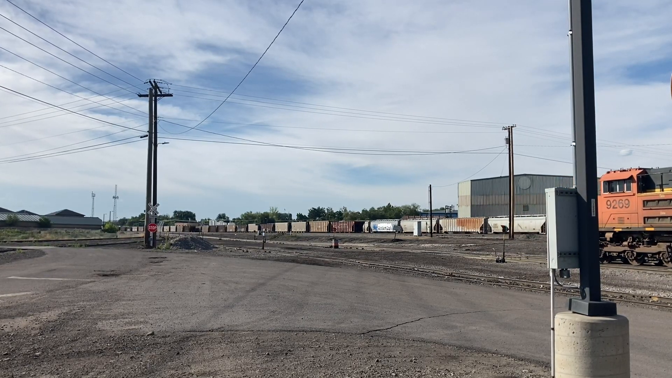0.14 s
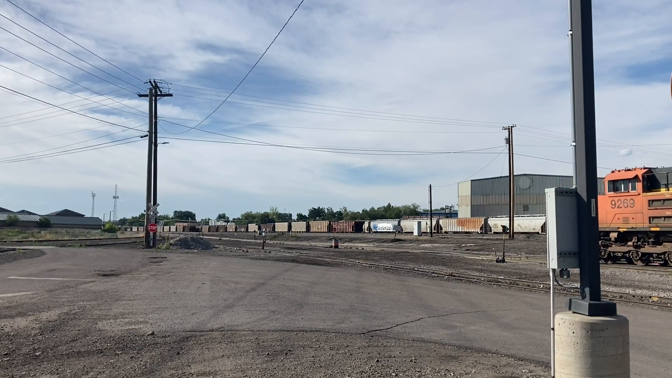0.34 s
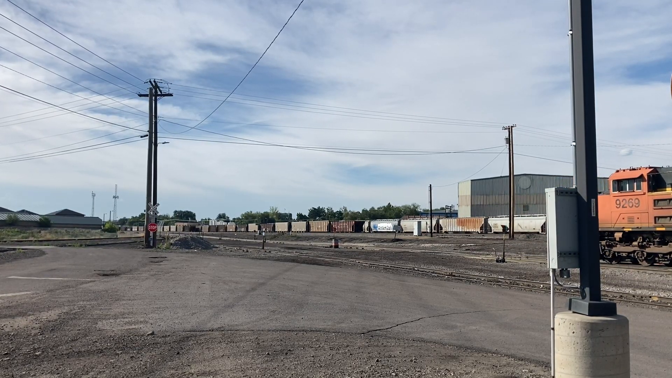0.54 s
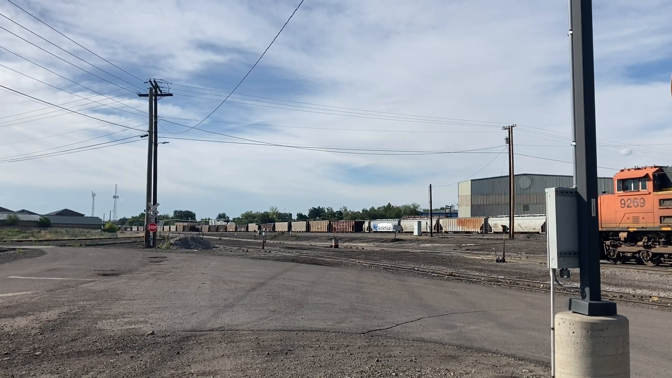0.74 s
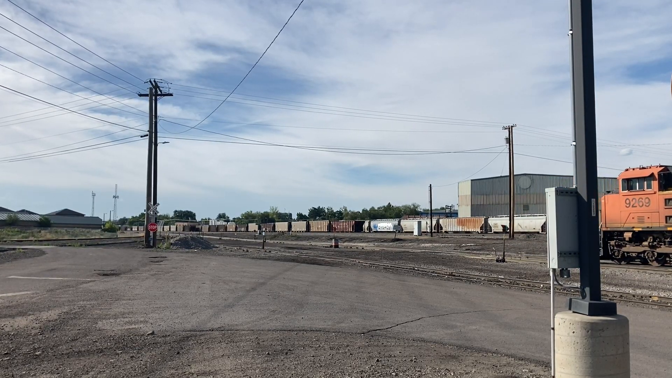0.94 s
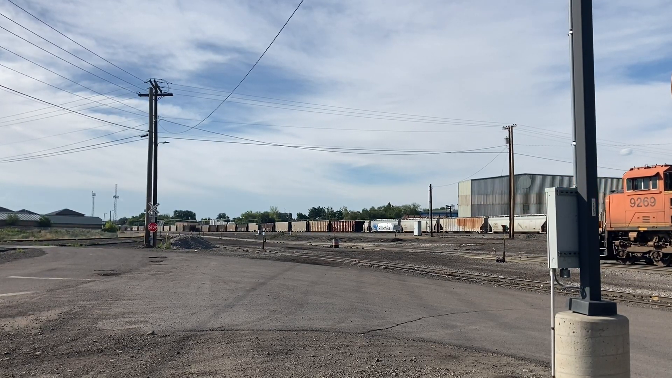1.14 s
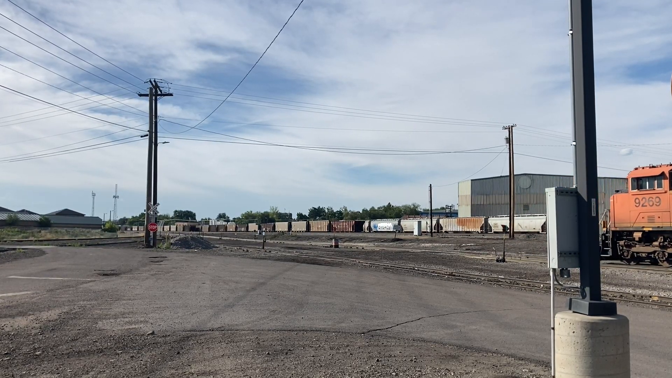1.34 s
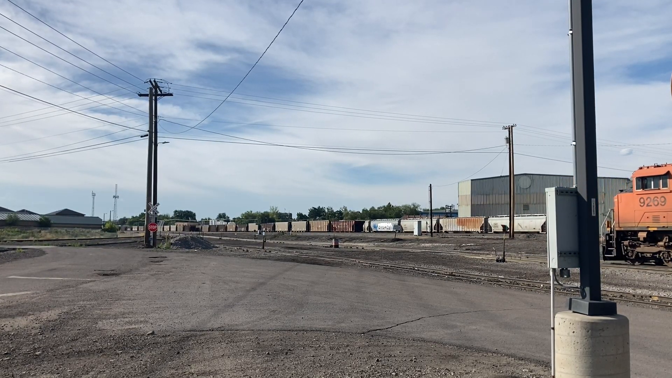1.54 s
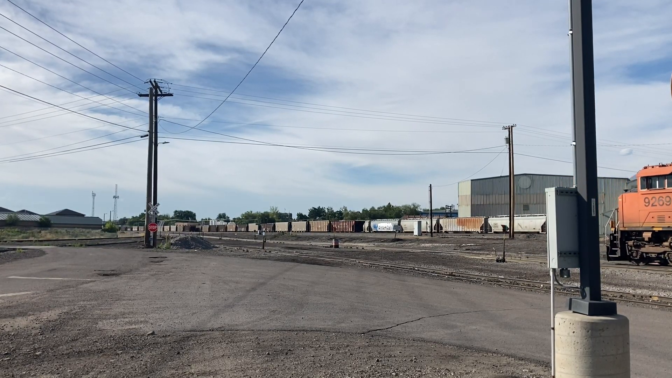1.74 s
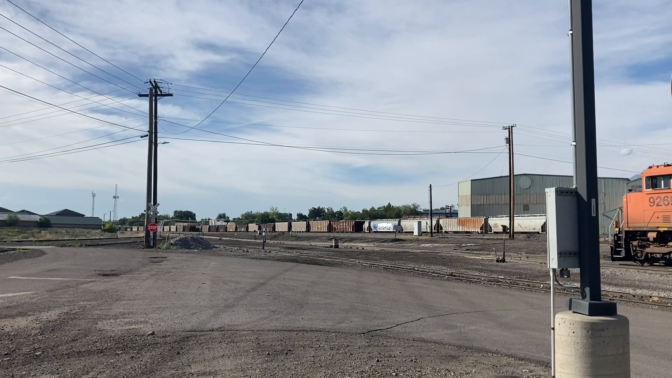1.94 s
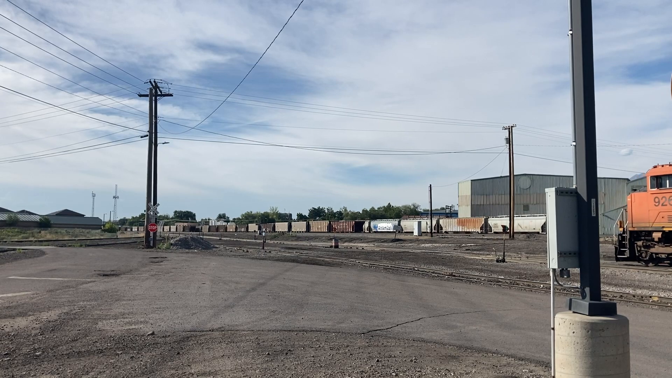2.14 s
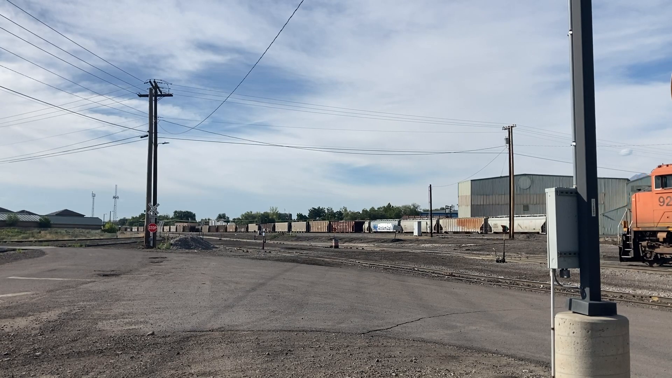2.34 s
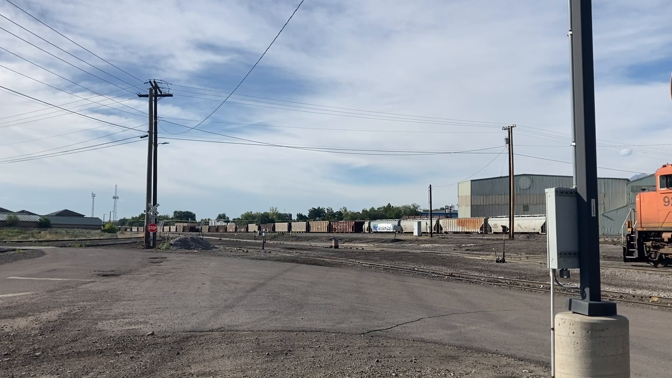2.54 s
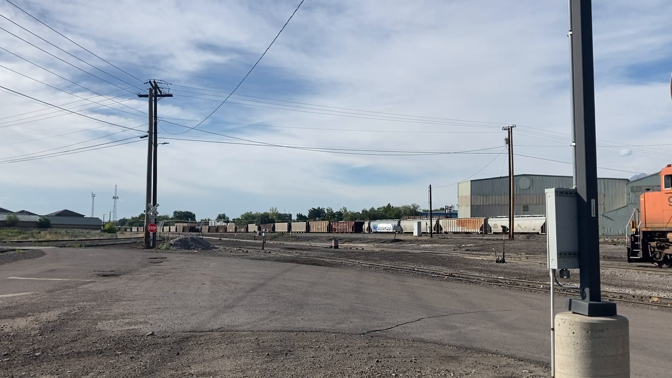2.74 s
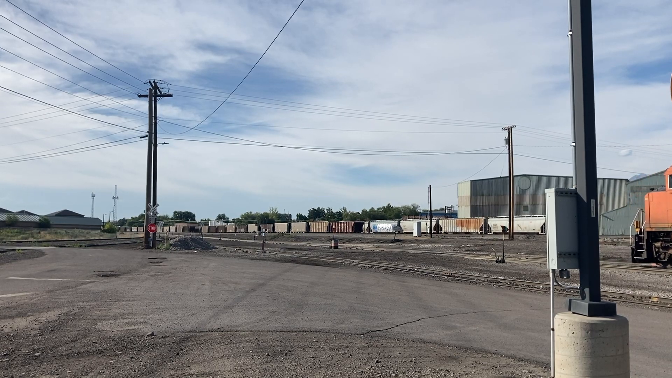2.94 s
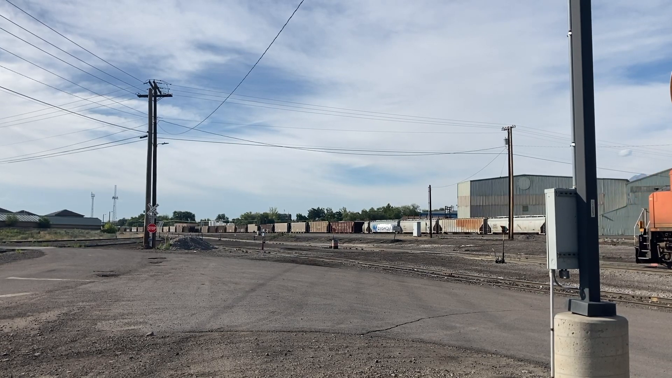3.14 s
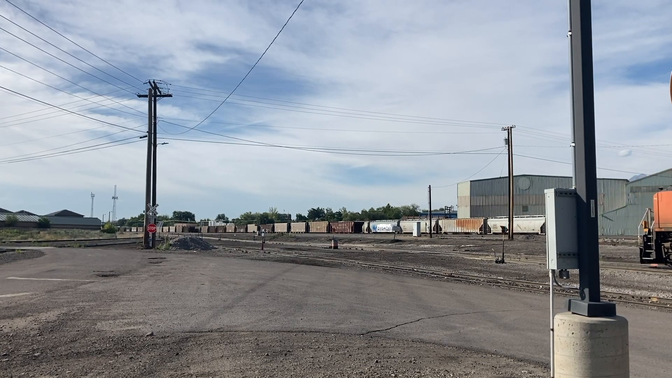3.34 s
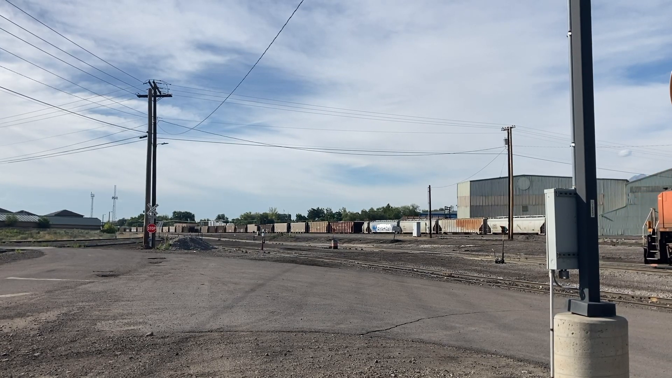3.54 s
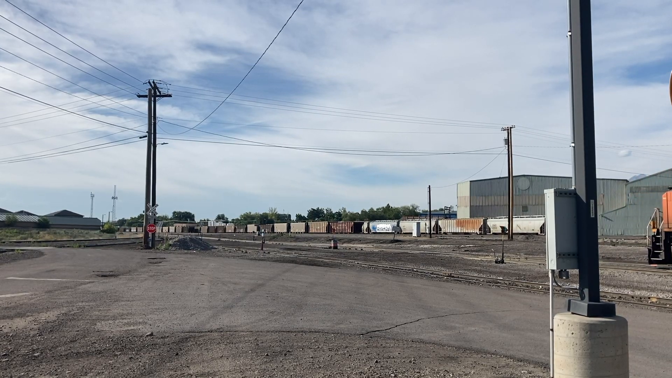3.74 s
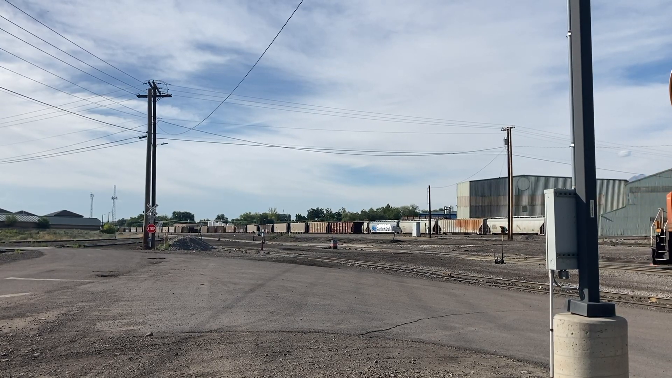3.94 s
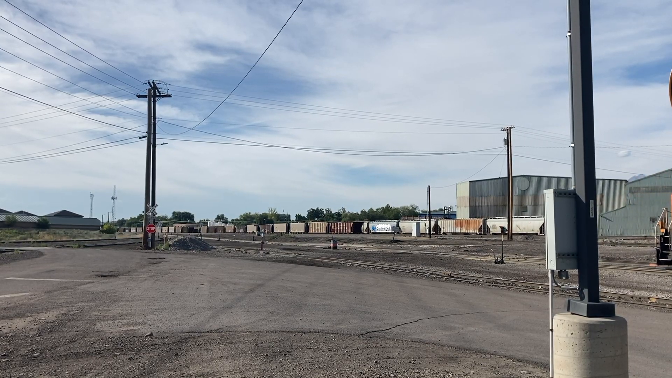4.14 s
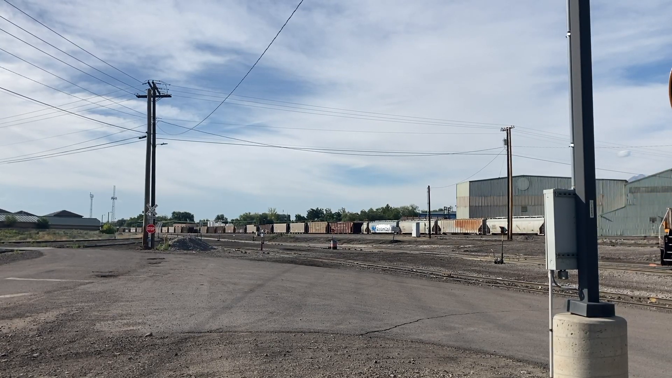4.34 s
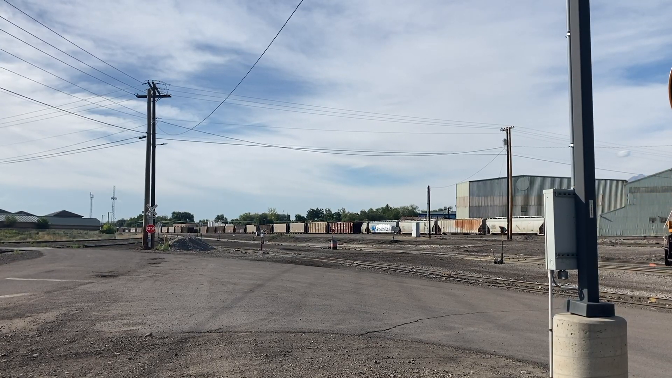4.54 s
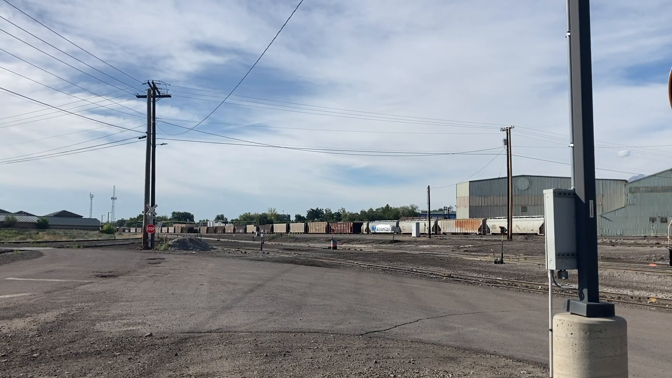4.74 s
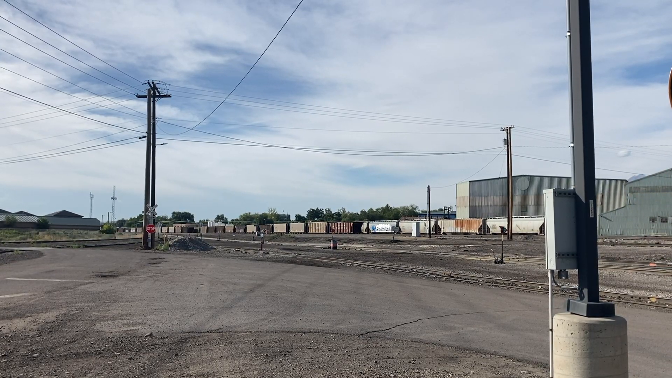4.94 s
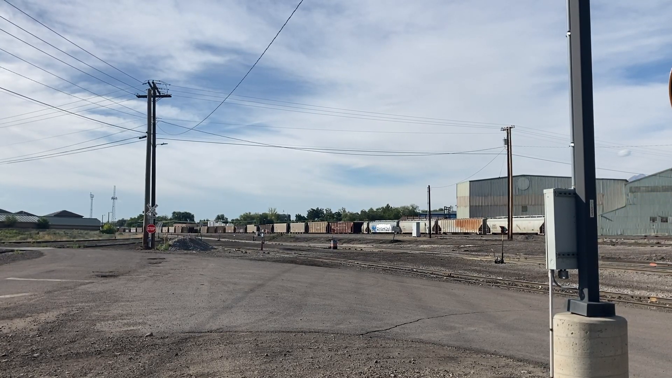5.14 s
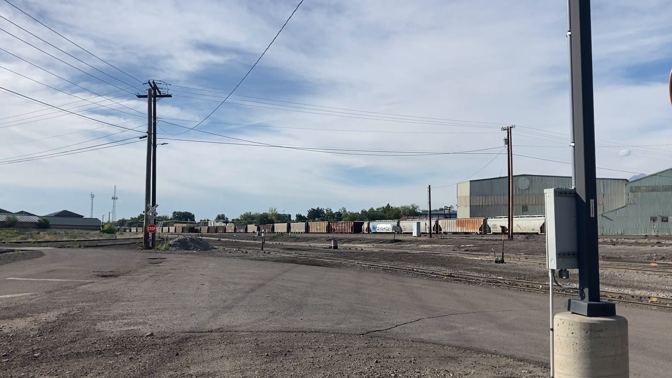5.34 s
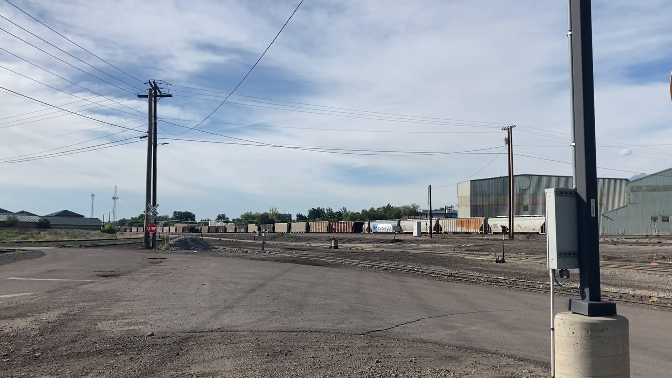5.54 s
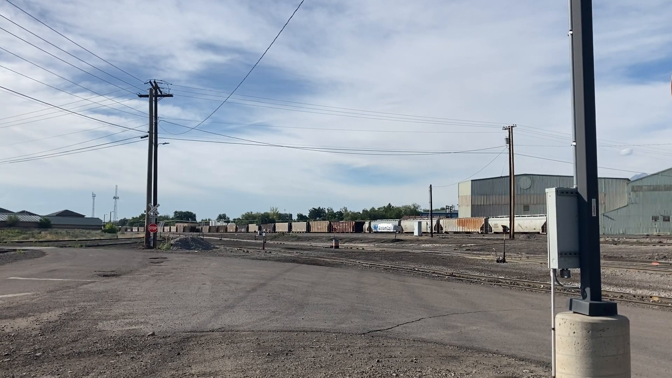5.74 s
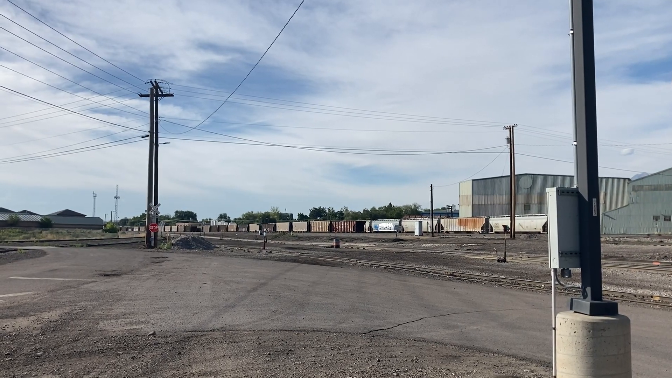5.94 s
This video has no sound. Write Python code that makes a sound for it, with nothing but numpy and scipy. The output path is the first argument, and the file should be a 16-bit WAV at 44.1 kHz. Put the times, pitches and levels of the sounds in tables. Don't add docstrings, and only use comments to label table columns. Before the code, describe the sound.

Heavy diesel engine rumble with a fast throb and thin whine sinks in pitch and recedes, with metallic chirps and a late wheel squeal.

```python
import sys
import numpy as np
from scipy import signal
from scipy.fft import rfft, irfft, next_fast_len
from scipy.io import wavfile
from scipy.ndimage import uniform_filter1d

SR = 44100
rng = np.random.default_rng(int(sys.argv[2]) if len(sys.argv) > 2 else 0)


def gain_from_decibels(decibels):
    exponent = np.asarray(decibels, float) / 20
    return 10 ** exponent


def log_audio(samples):
    frames = np.atleast_2d(samples).T
    limited = np.clip(frames, -1, 1)
    pcm = np.round(limited * 32767).astype(np.int16)
    wavfile.write(sys.argv[1], SR, pcm)


N = 268569
TIME_S = np.arange(N) / SR
EDGE = SR // 4
SIZE = next_fast_len(N + 2 * EDGE)
HZ = np.maximum(np.arange(SIZE // 2 + 1) * SR / SIZE, 1)

# (time [s], turn rate [Hz])
CRANK_HZ = [
    (0, 11.865),
    (1.2, 11.91),
    (1.8, 11.74),
    (3.6, 10.855),
    (5.4, 10.025),
    (6.09, 9.85),
]
# (time [s], level [dB])
BARK_DB = [(0, -32), (1.2, -30.5), (1.8, -27), (3.0, -23.5), (3.6, -23.5), (4.2, -22.5), (5.4, -22.5),
           (5.75, -26), (6.09, -28)]
# (centre [Hz], width [Hz], level [dB])
UPPER_STACK_MODES = [(194.4, 18.4, 2), (212.35, 8.3, -11)]
# (centre [Hz], width [Hz], level [dB])
LOWER_STACK_MODES = [(149.1, 14.2, 6), (124.7, 15.6, 3.5), (100.8, 12, -6.5)]
# (centre [Hz], width [Hz], level [dB])
CRANKCASE_MODES = [(65.5, 20, 7), (76.7, 18, 11.5)]
# (centre [Hz], width [Hz], level over the leak [dB])
VALVE_GEAR_MODES = [(2580, 150, -11), (3150, 300, -5), (4500, 1200, -5.5)]
# (start [s], end [s], level [dB])
RATTLE_BOUTS = [
    (2.4, 3.75, 1.5),
]
# (start [s], end [s], level [dB])
THROB_GEAR_BOUTS = [(-.3, .8, -45), (.85, 1.27, -42), (1.3, 1.63, -47), (2.35, 2.8, -53), (3.1, 3.45, -52)]

# (time [s], firing rate [Hz])
FIRING_HZ = [(0, 49.5), (.4, 49.55), (1.6, 50.33), (2.0, 50.14), (2.4, 49.42), (4.0, 44.5), (4.4, 43.2),
             (4.8, 42.3), (5.2, 41.45), (6.09, 40.65)]
# (multiple of the eight-firing cycle [-], level over the hum [dB])
HUM_ORDERS = [
    (8, 0),
    (9, -7),
    (10, -12),
]
# (multiple of the eight-firing cycle [-], level [dB])
SIDE_ORDERS = [(11, -36), (12, -41), (13, -40), (14, -43), (15, -41), (16, -42), (17, -42)]
# (multiple of firing rate [-], start [s], end [s], level [dB])
OVERTONES = [(5, .4, 1.3, -44), (6, .3, 1.1, -48), (7, 2.3, 2.85, -45), (7, 2.9, 3.5, -47),
             (7.3, 4.7, 5.25, -47), (7.3, 5.6, 6.3, -46), (9, 1.15, 1.5, -46), (14, .8, 1.75, -46),
             (14, 2.55, 3.0, -47), (16.1, 4.6, 5.2, -50), (15.4, 5.0, 5.5, -50)]
# (start [s], end [s], level [dB])
GEAR_BOUTS = [(-.3, .74, -41), (.8, .92, -50), (.95, 1.37, -45), (1.4, 2.07, -43), (2.15, 2.42, -49),
              (2.45, 2.72, -46), (2.8, 3.1, -47), (3.1, 3.5, -50), (4.1, 4.9, -50)]
# (start [s], end [s], level [dB])
OCTAVE_BOUTS = [(-.3, 1.0, -64), (1.0, 1.38, -60), (1.52, 1.9, -60), (1.62, 1.84, -58), (1.95, 2.04, -59)]
# (start [s], end [s], level [dB])
IDLER_BOUTS = [
    (-.3, .3, -55),
    (1.25, 2.12, -51),
    (2.25, 2.42, -53),
]
# (start [s], end [s], level [dB])
BLOWER_BOUTS = [
    (2.9, 3.3, -52),
    (3.55, 4.55, -50.5),
    (4.55, 5.15, -54),
]
# (start [s], end [s], level [dB])
TURBO_BOUTS = [(-.2, .12, -61), (.2, .6, -66), (.85, 1.62, -60), (1.76, 1.92, -60), (2.25, 3.65, -62),
               (3.65, 4.15, -58.5), (4.22, 4.9, -62), (4.95, 5.18, -64), (5.25, 6.3, -63)]

# (time [s], cycle rate [Hz])
THIRD_CYCLE_HZ = [(0, 6.03), (1.5, 6.04), (2.0, 5.9), (2.8, 5.68), (3.6, 5.5), (4.4, 5.35), (5.2, 5.19),
                  (6.09, 5.02)]
# (multiple of cycle [-], start [s], end [s], level [dB])
THIRD_ORDERS = [(11, .1, 1.5, -24), (11, 3.3, 6.5, -35), (12, 1.8, 6.5, -30), (12, 2.5, 3.3, -31),
                (13, -.4, 1.3, -22), (13, 1.3, 3.8, -33), (13, 3.9, 5.8, -27), (15.5, -.4, 1.6, -34),
                (19.6, 1.1, 1.9, -34), (15, 4.2, 6.5, -34), (16, 4.2, 6.5, -35), (16, 5.3, 6.5, -36),
                (17, -.4, 1.4, -32)]

# (frequency [Hz], density [dB per Hz])
ROAR_COLOUR = [(28, -60), (45, -45), (80, -45), (200, -50), (250, -59), (500, -67), (690, -64), (790, -69),
               (1350, -66), (1650, -74), (3100, -81), (5500, -88), (9000, -99), (13000, -116)]
# (centre [Hz], width [Hz], level [dB])
PANEL_MODES = [(110.4, 13, -34.5), (169.5, 20.6, -33), (240.3, 23, -49.5), (294, 54, -45),
               (357.4, 67, -45.5), (450, 60, -49.5), (631.7, 73, -44.5), (687, 36, -46.5), (909, 220, -47),
               (1410, 140, -53), (2100, 540, -52), (3046, 280, -60), (6900, 2700, -66)]
# (frequency [Hz], share [-])
FADE_SHARES = [(100, 0.054), (250, 1), (1000, 0.83), (4000, 1)]

# (time [s], peak level [dB], pitch [Hz])
CHIRPS = [(2.4379, -41, 3150), (2.6045, -41, 3170), (2.6908, -47, 3170), (2.7626, -46, 3210),
          (2.9587, -43, 3160), (3.049, -47, 3140), (3.1443, -51, 3040), (3.2355, -41, 3150),
          (3.3218, -47, 3020), (3.5004, -45, 3150), (3.5838, -44, 3080), (3.7778, -47, 3140),
          (3.8701, -49, 3150), (4.152, -46, 3140),
          (2.5755, -37, 2710),
    (2.7501, -45, 2680),
    (2.9312, -45, 2620),
]
# (time [s], level [dB], centre [Hz], rise [s], fall [s])
SPITS = [
    (.835, -45.5, 7200, 0.024, 0.017),
    (2.275, -47.5, 6760, 0.01, 0.033),
    (2.58, -53, 6750, 0.025, 0.044),
    (3.1, -58, 6400, 0.011, .015),
    (3.856, -52, 7250, 0.0076, 0.016),
]
# (start [s], end [s], level [dB])
SQUEAL_BOUTS = [
    (5.65, 5.72, -53),
    (5.8, 5.91, -49),
    (5.99, 6.2, -46),
]
# (start [s], end [s], level [dB])
RAIL_BOUTS = [
    (3.6, 4.0, -71),
    (4.45, 6.3, -68),
]
RAIL_PORT_GAINS = (-.6, 1)

# (centre [Hz], width [Hz], gain [dB])
HOLLOWS = [(3600, 65, -11.5), (5200, 1600, -2), (6060, 180, 3), (1180, 400, -2), (255, 31, 0.5),
           (4270, 59, 5), (751, 44, -1), (527, 50, -1.5), (1670, 200, 1), (241, 18, -0.5), (968, 52, 1.5)]
# (frequency [Hz], left minus right [dB], likeness [0-1], left lead besides its lag [rad])
PORTS = [(40, -.8, .95, 0), (70, -1.5, .9, -.1), (150, -2, .95, -.03), (260, -.6, .98, 0),
         (430, 2, .9, -.5), (620, -2.5, .92, -.8), (820, -7, .85, 0), (1100, 1, .8, -.3),
         (1350, -1, .94, .45), (1750, 1, .8, .4), (2200, 2.2, .4, 0), (2600, 2, .4, .3),
         (3100, 1.2, .7, .1), (3600, 0, .35, 1.2), (4150, 0, .7, -.5), (4750, -1, .7, 1.6),
         (5250, -4, .45, .6), (5680, -3.5, .4, 1.9), (6500, 0, .8, -1), (7600, 0, .85, -.4),
         (8700, 0, .95, -.6), (9400, 0, .95, .3), (11400, 0, .9, .6), (13500, 0, .9, 1.2),
         (14300, 0, .9, 2), (15000, 0, .9, 1)]


def curve(table):
    time_s, value = np.transpose(table)
    return np.interp(TIME_S, time_s, value)


def over_hz(table, column):
    table = np.array(table)
    return np.interp(np.log(HZ), np.log(table[:, 0]), table[:, column])


def unit(x):
    return x / np.sqrt(np.mean(x ** 2))


def noise():
    return rng.standard_normal(N)


def ring(x, hz, width_hz):
    b, a = signal.iirpeak(hz, hz / width_hz, fs=SR)
    return signal.lfilter(b, a, signal.lfilter(b, a, x))


def walk(rate_hz):
    hold = int(SR / rate_hz)
    held = np.repeat(rng.standard_normal(N // hold + 1), hold)
    return 1.5 * uniform_filter1d(uniform_filter1d(held, hold), hold)[:N]


def line(hz, db, wander_db, rate_hz, blur_turns):
    turns = np.cumsum(hz + 0 * TIME_S) / SR + rng.random() + blur_turns * walk(rate_hz)
    return np.sqrt(2) * gain_from_decibels(db + wander_db * walk(rate_hz)) * np.sin(2 * np.pi * turns)


def ramp(middle_s, takes_s):
    return np.clip(.5 + (TIME_S - middle_s) / takes_s, 0, 1)


def bouts(table, quiet_db, takes_s):
    gain = gain_from_decibels(quiet_db)
    for start_s, end_s, db in table:
        gain = gain + gain_from_decibels(db) * ramp(start_s, takes_s) * (1 - ramp(end_s, takes_s))
    return 20 * np.log10(gain)


def spreading_db():
    start_m, away_m_s = 34.6, 7.75
    distance_m = start_m + away_m_s * TIME_S
    return -20 * np.log10(distance_m / np.mean(distance_m))


def stack(blows, modes):
    out = 0
    for k, (hz, width_hz, db) in enumerate(modes):
        pipe = ring(ring(blows, hz, 2.13 * width_hz), hz, 2.13 * width_hz)
        out = out + (-1) ** k * gain_from_decibels(db) * unit(pipe)
    return unit(out)


def throb_exhaust(turns):
    blow_turn, stack_lag_s = -.1, 0.0156
    open_db, shut_db, screened_db = 3.5, -2, -1
    count = np.floor(turns - blow_turn)
    blows = (np.diff(count, prepend=count[0] - 1) > 0) * gain_from_decibels(noise())
    uneven = blows * (1 + 1.7 * np.cos(np.pi * count))
    upper = np.roll(stack(blows, UPPER_STACK_MODES), int(stack_lag_s * SR))
    lower = gain_from_decibels(-1.0) * stack(blows, LOWER_STACK_MODES) + gain_from_decibels(-8) * stack(uneven, CRANKCASE_MODES)
    upper_db = curve(BARK_DB)
    lower_db = upper_db + open_db + (shut_db - open_db) * ramp(1.6, .6) + screened_db * ramp(4.2, 1.7)
    return gain_from_decibels(upper_db) * upper + gain_from_decibels(lower_db) * lower


def leak_and_valve_gear(turns):
    leak_turn, leak_db, leak_fade_share = .83, -63, 1.58
    beat = np.cos(2 * np.pi * (turns - leak_turn))
    puff = gain_from_decibels(3.9 * np.tanh(3.5 * beat) + 0.74 * walk(26))
    tick = gain_from_decibels(8 * beat - 2)
    white = noise()
    hiss = ring(white, 10450, 2400) + gain_from_decibels(-5) * ring(white, 9300, 1400) + gain_from_decibels(-11) * ring(white, 12900, 1900)
    rattle = 0
    for hz, width_hz, db in VALVE_GEAR_MODES:
        rattle = rattle + gain_from_decibels(db + 2.2 * walk(30)) * unit(ring(noise(), hz, width_hz))
    rattle = gain_from_decibels(bouts(RATTLE_BOUTS, -0.39, 0.54)) * tick * rattle
    return gain_from_decibels(leak_db + leak_fade_share * spreading_db()) * (unit(puff * hiss) + rattle)


def throbber():
    crank_hz, gear_ratio = curve(CRANK_HZ), 107.2
    turns = np.cumsum(crank_hz) / SR
    gear_db = bouts(THROB_GEAR_BOUTS, -60, .08) + 1
    gear = line(gear_ratio * crank_hz, gear_db, wander_db=1.6, rate_hz=14, blur_turns=.03)
    return throb_exhaust(turns) + leak_and_valve_gear(turns) + gear


def firing_hum(firing_hz, slowing_hz):
    hum_db = -18 + 1.88 * slowing_hz
    cycle_hz = firing_hz / 8
    out = 0
    for k, db in HUM_ORDERS:
        out = out + line(k * cycle_hz, hum_db + db, wander_db=.7, rate_hz=6, blur_turns=.02)
    for k, db in SIDE_ORDERS:
        out = out + line(k * cycle_hz, db, wander_db=-2.5, rate_hz=1.2, blur_turns=0.045)
    for k, start_s, end_s, db in OVERTONES:
        level_db = bouts([(start_s, end_s, db)], -70, .3)
        out = out + line(k * firing_hz, level_db, wander_db=2.5, rate_hz=7, blur_turns=.1)
    return out


def gears_and_turbo(firing_hz, slowing_hz):
    gear_hz = 27.6 * firing_hz
    gear_db = bouts(GEAR_BOUTS, -57, .07) + 1.6 * slowing_hz + 2.5
    idler_db, octave_db = bouts(IDLER_BOUTS, -64, .1), bouts(OCTAVE_BOUTS, -72, .08)
    blower_db = bouts(BLOWER_BOUTS, -62, .3)
    turbo_db = bouts(TURBO_BOUTS, -67, .06) + 1.5 * walk(35)
    out = line(gear_hz, gear_db, wander_db=1.3, rate_hz=14, blur_turns=.025)
    out = out + line(.868 * gear_hz, idler_db, wander_db=2, rate_hz=12, blur_turns=.06)
    out = out + line(2 * gear_hz, octave_db, wander_db=1.4, rate_hz=14, blur_turns=.06)
    out = out + line(.436 * gear_hz, blower_db, wander_db=2.2, rate_hz=5, blur_turns=.08)
    return out + line(4.085 * gear_hz, turbo_db, wander_db=3, rate_hz=120, blur_turns=.2)


def hummer():
    firing_hz, full_hz = curve(FIRING_HZ), 50
    slowing_hz = np.minimum(firing_hz - full_hz, 0)
    return firing_hum(firing_hz, slowing_hz) + gears_and_turbo(firing_hz, slowing_hz)


def third_engine():
    cycle_hz = curve(THIRD_CYCLE_HZ)
    out = line(31.5, -44, wander_db=2, rate_hz=1.3, blur_turns=.04)
    for k, start_s, end_s, db in THIRD_ORDERS:
        level_db = bouts([(start_s, end_s, db)], -70, .4)
        out = out + line(k * cycle_hz, level_db, wander_db=1.2, rate_hz=4, blur_turns=.04)
    return out


def roar():
    spectrum = rfft(rng.standard_normal(SIZE)) * gain_from_decibels(over_hz(ROAR_COLOUR, 1) - 2.5) * np.sqrt(SR / 2)
    panels = sum(gain_from_decibels(db) * unit(ring(noise(), hz, width_hz)) for hz, width_hz, db in PANEL_MODES)
    spectrum += rfft(panels, SIZE)
    scattered = spectrum * np.exp(2j * np.pi * rng.random(len(HZ)))
    paths = np.array([spectrum, scattered])
    fade_db = spreading_db()
    fade_hz, fade_share = np.transpose(FADE_SHARES)
    width_oct = 2 / 3
    out, shared = 0, walk(4.3)
    for octave in np.arange(4.5, 14.5, width_oct):
        band = np.clip(1 - np.abs(np.log2(HZ) - octave) / width_oct, 0, 1)
        shared = 0.79 * shared + 0.31 * walk(9)
        share = np.interp(octave, np.log2(fade_hz), fade_share)
        db = share * fade_db + .7 * shared + 1.41 * walk(28)
        out = out + gain_from_decibels(db) * irfft(paths * band, SIZE)[:, :N]
    return out


def covers():
    level_db, rise_s, fall_s = -5, 0.0081, 0.023
    out = 0
    for s, db, hz in CHIRPS:
        age = np.where(TIME_S < s, (s - TIME_S) / rise_s, (TIME_S - s) / fall_s)
        out = out + gain_from_decibels(db + level_db) * np.exp(-age ** 2) * np.sin(2 * np.pi * hz * TIME_S)
    return out


def air_spits():
    out = 0
    for s, db, hz, rise_s, fall_s in SPITS:
        age = np.where(TIME_S < s, ((s - TIME_S) / rise_s) ** 2, (TIME_S - s) / fall_s)
        out = out + gain_from_decibels(db) * np.exp(-age) * unit(ring(noise(), hz, 3200))
    return out


def wheel_squeal():
    return line(2240, bouts(SQUEAL_BOUTS, -79.0, .04), wander_db=1.5, rate_hz=30, blur_turns=.08)


def rail():
    return line(5460, bouts(RAIL_BOUTS, -85, .06), wander_db=1.8, rate_hz=8, blur_turns=.06)


def padded_spectrum(x):
    return rfft(np.pad(x, EDGE, "reflect", reflect_type="odd"), SIZE)


def scene():
    left_lag_s = 0.000274
    engines = throbber() + hummer() + third_engine()
    tones = engines + covers() + air_spits() + wheel_squeal()
    colour = gain_from_decibels(sum(db * np.exp(-((HZ - hz) / width_hz * 2) ** 2) for hz, width_hz, db in HOLLOWS))
    direct, scattered = roar()
    tones, direct, scattered = (colour * padded_spectrum(x) for x in (tones, direct, scattered))
    alike = np.clip(over_hz(PORTS, 2), 0, 1)
    late = np.exp(1j * (over_hz(PORTS, 3) - 2 * np.pi * HZ * left_lag_s))
    tilt = gain_from_decibels(over_hz(PORTS, 1) / 2)
    left = tilt * late * (tones + alike * direct + np.sqrt(1 - alike ** 2) * scattered)
    right = (tones + direct) / tilt
    ports = np.array([irfft(left, SIZE), irfft(right, SIZE)])[:, EDGE:EDGE + N]
    return ports + np.outer(RAIL_PORT_GAINS, rail())


def roll_off(x):
    return signal.sosfilt(signal.butter(12, 15100, fs=SR, output="sos"), x)


def record(dry):
    high_pass = signal.butter(4, 28, "high", fs=SR, output="sos")
    mix = signal.sosfilt(high_pass, dry)
    return roll_off(mix)


dry = scene()
out = record(dry)
log_audio(out)
```